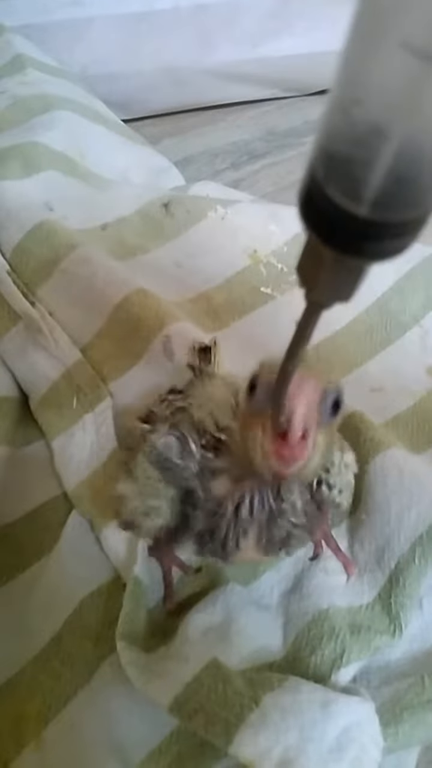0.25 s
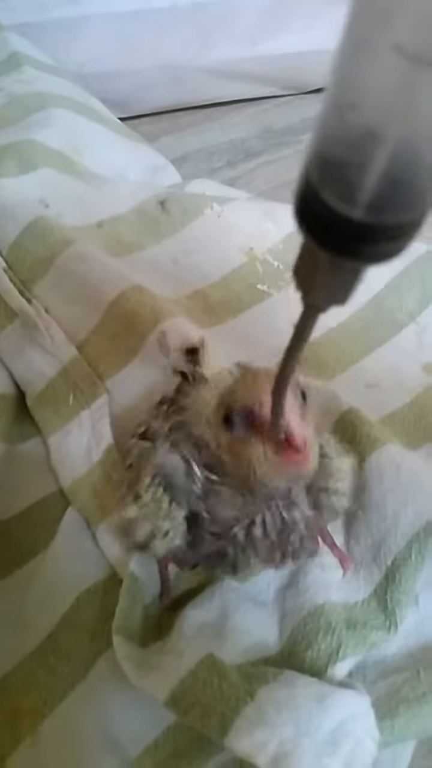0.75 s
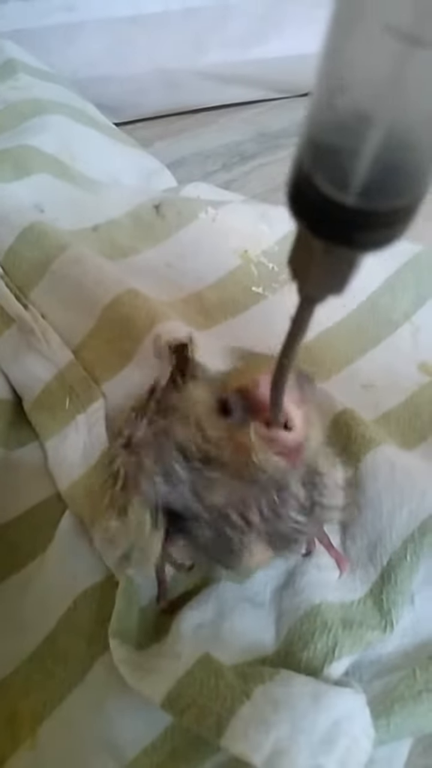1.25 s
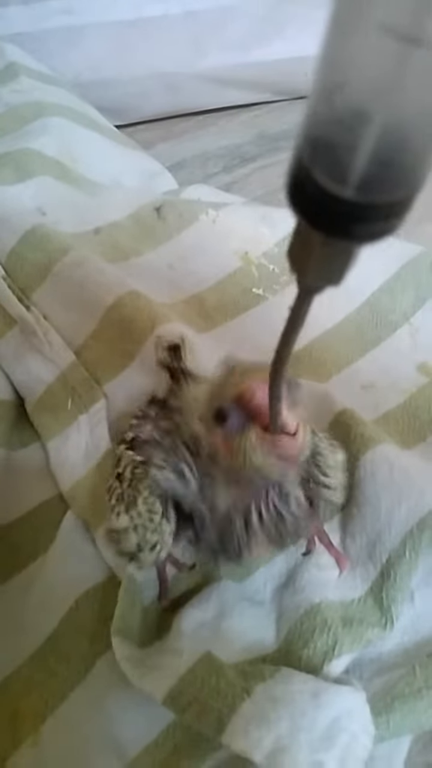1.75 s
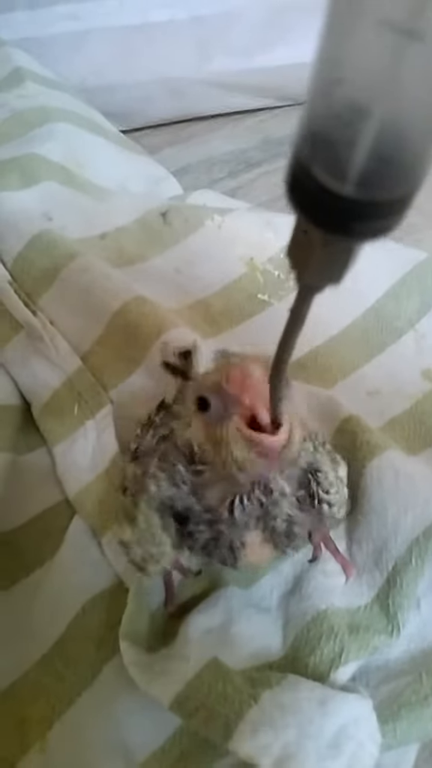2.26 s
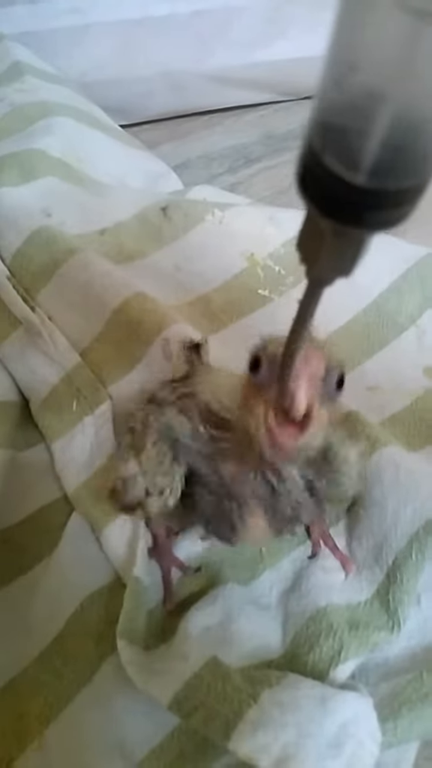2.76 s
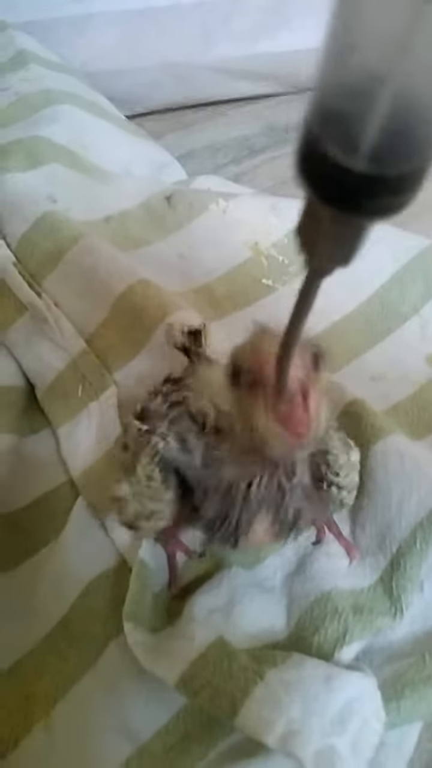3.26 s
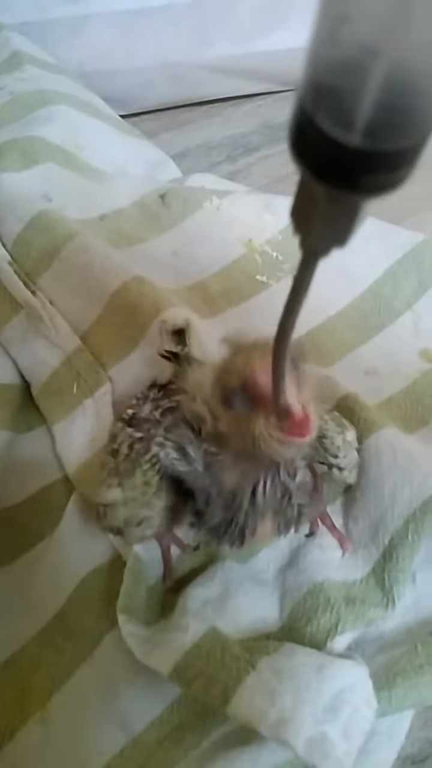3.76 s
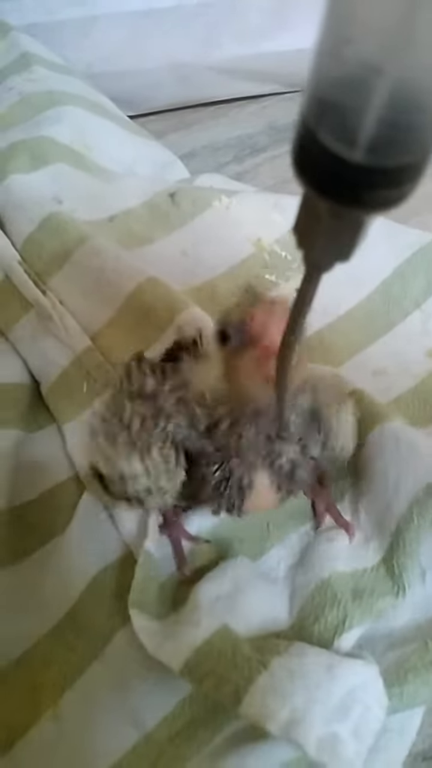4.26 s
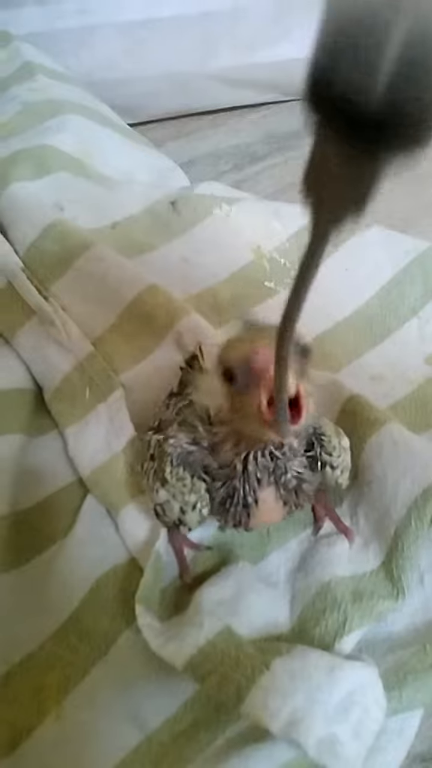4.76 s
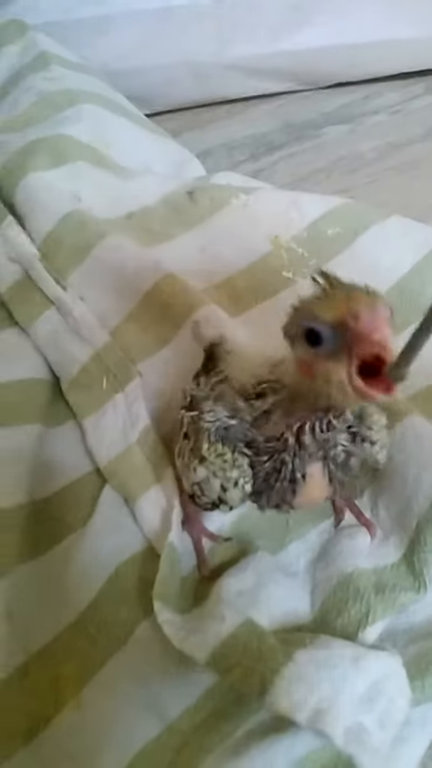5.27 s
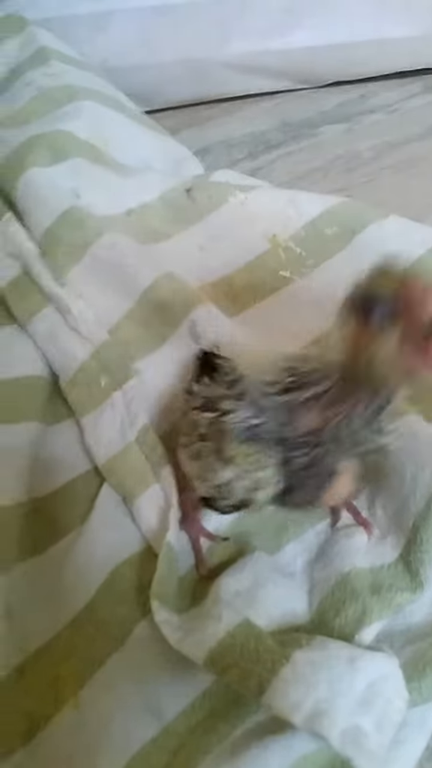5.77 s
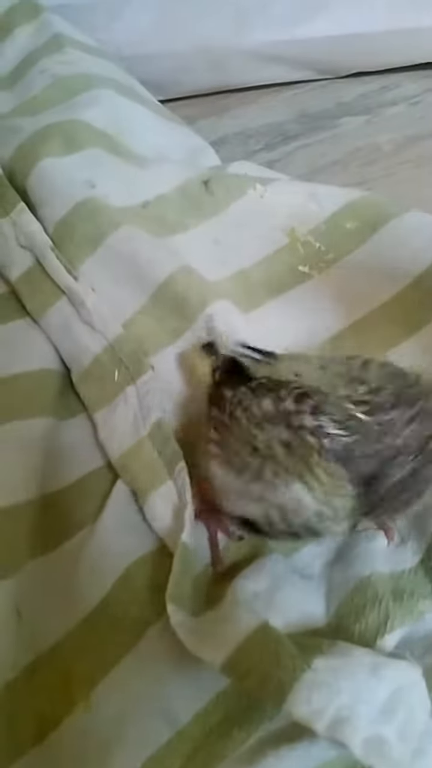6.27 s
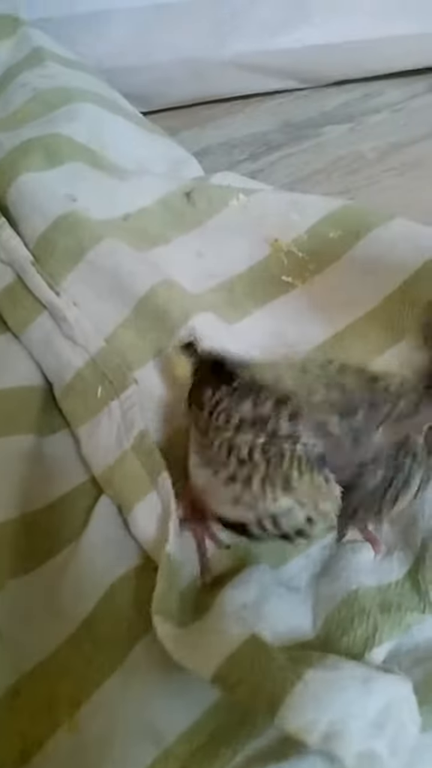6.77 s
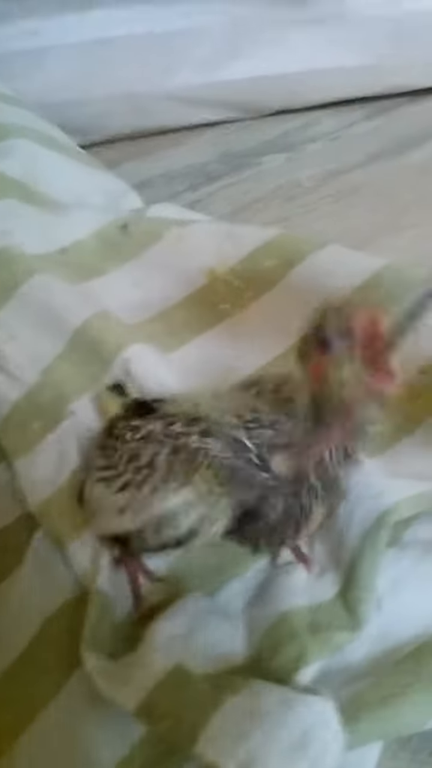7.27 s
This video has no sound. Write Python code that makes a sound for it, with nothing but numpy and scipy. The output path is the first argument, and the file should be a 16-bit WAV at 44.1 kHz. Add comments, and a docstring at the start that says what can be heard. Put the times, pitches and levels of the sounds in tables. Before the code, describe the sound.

A nestling begs close to the microphone in a small, hard-surfaced room, each cheep leaving a short bright ring. Every chirp lasts only a few hundredths of a second, starting very high and snapping steeply downward. From 0 to 0.9 s they are moderate, about six per second; from 0.95 to 2 s they grow piercing, a few with a slight overloaded pop. Weaker chirps follow, mixed with loud ones near 2.8, 3.1, 4.1 and 4.3 s. Tiny wet beak ticks run until about 3.7 s, with thin squeaks and dry rasps between calls. From 4.4 to 5.8 s chirping nearly stops: creaky rasps, a clearer squeak at 4.6 and a single strong chirp at 5.1. At 5.8 s a chirp brings soft, rumbling cloth rustle that stays, swelling unevenly. From 6.25 s to the end at about 7.5 s, mostly loud chirps race on. A faint, wavering low appliance hum and room air continue throughout.

```python
"""Nestling begging at a syringe

A nestling on a towel begs while it is fed from a syringe, close to a microphone in a small hard room.
Each chirp is a harmonic tone of very fast falling pitch that flares as it sweeps through the throat resonance.
Between chirps come faint squeaks (sliding sines), rasps (pulse trains ringing the throat) and, early on, ticks.
An appliance hums as a set of wavering lines; soft rumbling noise sets in as the chick shuffles off."""
import sys
import numpy as np
from scipy import signal
from scipy.fft import rfft, irfft
from scipy.io import wavfile
from scipy.ndimage import uniform_filter1d, minimum_filter1d

SR = 44100
rng = np.random.default_rng(int(sys.argv[2]) if len(sys.argv) > 2 else 0)


def wav_record(signal):
    """Record a signal, one row per channel, as 16-bit PCM in the file named by sys.argv[1]."""
    frames = np.transpose(np.atleast_2d(signal))
    bounded = np.clip(frames, -1, 1)
    # unit amplitude maps onto the largest positive 16-bit level
    quanta = np.round(bounded * 32767).astype(np.int16)
    wavfile.write(sys.argv[1], SR, quanta)


N = 332073
T = np.arange(N) / SR
LEAD = SR // 10  # samples of chirping before the scene opens, so that the room already rings


def undb(db):
    """Amplitude ratio: decibels to gain."""
    return 10 ** (np.asarray(db) / 20)


def gain_at(hz, points):
    """Frequency response: gain at hz, by interpolating (Hz, dB) points on a logarithmic frequency axis."""
    f, db = np.transpose(points)
    return undb(np.interp(np.log(np.maximum(hz, 1)), np.log(f), db))


def colour(x, points):
    """Linear filtering: multiply the spectrum of x by the response through the points."""
    return irfft(rfft(x) * gain_at(np.fft.rfftfreq(len(x), 1 / SR), points), len(x))


def noise(points):
    """Filtered white noise, scaled to rms 1."""
    x = colour(rng.standard_normal(N), points)
    return x / x.std()


def walk(rate, size=N):
    """Band-limited fluctuation: random values, rate per second, joined by lines; spread near 1."""
    at = np.arange(size) * rate / SR
    knots = int(at[-1]) + 2
    return 1.29 * np.interp(at, np.arange(knots), rng.standard_normal(knots))


def add(out, s, x):
    """Superposition: mix x into out from time s on."""
    i = max(int(s * SR), 0)
    out[i:i + len(x)] += x[:len(out) - i]


def gate(length, edge):
    """Times and amplitude envelope of a short sound with sine-squared edges, both in seconds."""
    t = np.arange(int((length + edge) * SR)) / SR
    edge_share = np.clip(np.minimum(t, length + edge - t) / edge, 0, 1)
    return t, np.sin(np.pi / 2 * edge_share) ** 2


def background(air_db=-59.5, waver_db=-0.5, drift_hz=1.2):
    """Stationary noise of the room air plus the line spectrum of an appliance, wavering in level and pitch."""
    # colour of the room air: frequency_hz, density_db
    air_colour = [(30, -37.5), (60, -12.5), (120, -22.5), (180, -6.5), (280, -9.5), (350, -0.5),
                  (420, -5.5), (520, -5.5), (1000, -7.5), (2300, -12.5), (3900, -16), (4800, -53),
                  (8000, -43), (15000, -50)]
    # lines of the appliance hum: frequency_hz, level_db (rms)
    hum_lines = [(66, -78.5), (100, -84.5), (285, -74), (350, -68.5), (500, -65), (746, -71), (1000, -73.5)]
    hum = np.zeros(N)
    for hz, db in hum_lines:
        phase = 2 * np.pi * np.cumsum(hz + drift_hz * walk(6.6)) / SR
        hum += undb(db + waver_db * walk(6.3)) * np.sqrt(2) * np.sin(phase)
    return hum + undb(air_db) * noise(air_colour)


def rustle(start_s=5.78, attack_s=0.046, level_db=-54, shuffle_s=0.069, grain_db=2):
    """Friction noise: the uneven rubbing of cloth and hand sets in and stays, swelling with each shuffle."""
    # spectrum of the rubbing: frequency_hz, gain_db
    rubbing_colour = [(40, -27), (100, -10.5), (200, -11.5), (285, 9), (370, -3), (550, -4.5), (1200, -7.5),
                      (2000, -15.5), (4000, -46)]
    # shuffles: centre_s, swell_db
    shuffle_table = [(5.89, 1.5), (6.35, 3), (6.76, 5), (6.93, 2), (7.22, 3.5), (7.46, 6.5)]
    swell_db = sum(db * np.exp(-((T - s) / shuffle_s) ** 2) for s, db in shuffle_table)
    onset = np.clip((T - start_s) / attack_s, 0, 1)
    return onset * undb(level_db + swell_db + grain_db * walk(40)) * noise(rubbing_colour)


def pops(length_s=0.0035, edge_s=0.00057):
    """Gated noise: brief dull pops of overload under a few of the strong chirps."""
    # pops: centre_s, level_db (rms)
    pop_table = [(1.762, -32.5), (4.319, -36.5), (5.82, -28)]
    # spectrum of a pop: frequency_hz, gain_db
    pop_colour = [(100, -17.5), (400, 1.5), (1000, 1.5), (2500, 0), (5000, -4)]
    bursts = np.zeros(N)
    for s, db in pop_table:
        add(bursts, s - length_s / 2, undb(db) * gate(length_s, edge_s)[1])
    return bursts * noise(pop_colour)


def beak_ticks(per_s=14, tick_db=-42, scatter_db=4, until_s=3.7):
    """Poisson impulses through a resonance: tiny wet clicks while the beak works on the feeding tube."""
    hits = (rng.random(N) < per_s / SR) * (T < until_s)
    sizes = undb(tick_db + scatter_db * rng.standard_normal(N))
    # frequency in Hz, gain in dB
    tick_colour = [(500, -9), (2500, 16.5), (5000, -2.0), (7500, 1.5), (9500, -14.0), (13000, -17.5)]
    return colour(hits * sizes, tick_colour)


def rasps(scatter_db=2, edge_s=0.002, fade_db_per_s=70, flutter_db=1.5):
    """Pulsed excitation: the slack syrinx slaps shut at uneven intervals, each slap ringing the throat."""
    # rasps from the open beak: start_s, length_s, level_db (halfway through)
    rasp_table = [(1.915, 0.05, -42), (2.107, 0.036, -45.5), (2.177, 0.045, -50.5), (2.233, 0.056, -44.5),
                  (2.425, 0.02, -48), (2.593, 0.025, -43), (2.754, 0.02, -47), (4.518, 0.015, -28.5),
                  (4.54, 0.017, -29), (4.602, 0.066, -37.5), (4.687, 0.073, -39.5), (4.874, 0.122, -46),
                  (5.207, 0.022, -39.5), (5.919, 0.056, -41), (6.004, 0.01, -38), (6.038, 0.043, -39),
                  (6.201, 0.044, -48.5), (6.94, 0.06, -45.5), (7.103, 0.035, -38.5)]
    # ring of one slap: frequency_hz, gain_db
    slap_colour = [(2000, -38), (4200, -29.5), (4800, -19.5), (5400, -12), (6000, -4.5), (6600, -15.5),
                   (7400, -28), (8600, -45.5), (9600, -42), (10500, -61)]
    chance = rng.standard_normal((N // 20, 2))
    interval_s = .0018 * np.exp(.35 * chance[:, 0])
    at = (SR * np.cumsum(interval_s)).astype(int)
    slap_sizes = undb(scatter_db * chance[at < N, 1])
    slaps = np.bincount(at[at < N], slap_sizes, N)
    creak = colour(slaps, slap_colour)
    flow = np.zeros(N)
    for s, length, db in rasp_table:
        t, envelope = gate(length, edge_s)
        # each rasp weakens as the air runs out
        add(flow, s, undb(db - fade_db_per_s * (t - length / 2)) * envelope)
    return flow * undb(flutter_db * walk(120)) * creak / creak.std()


def squeaks(length_s=.014, rise_octaves=0.15, jitter=0.017, edge_s=0.0014, broken_db=7):
    """Near-sinusoidal oscillation: the weaker a squeak is blown, the more it slides upward and breaks up."""
    # thin squeaks between chirps: start_s, pitch_hz, level_db (rms)
    squeak_table = [(1.438, 3600, -42), (1.867, 5250, -38.5), (2.416, 5110, -38), (2.571, 4960, -43),
                    (2.729, 5060, -38), (3.046, 5460, -49.5), (3.198, 5770, -42.5), (3.534, 5620, -55),
                    (4.601, 6200, -22.5), (5.184, 5440, -32), (5.906, 4910, -34.5), (6.357, 5460, -34.5),
                    (6.518, 6040, -40), (7.237, 5370, -43)]
    out = np.zeros(N)
    t, envelope = gate(length_s, edge_s)
    for s, hz, db in squeak_table:
        weakness = np.clip((-22 - db) / 12, 0, 1)
        slide = 2 ** (rise_octaves * weakness * (t / length_s - .5))
        pitch = hz * slide * (1 + jitter * (1 + 2 * weakness) * walk(800, len(t)))
        flutter = undb(broken_db * weakness * walk(1100, len(t)))
        pressure = envelope * flutter / np.sqrt(np.mean(flutter ** 2))
        tone = np.sin(2 * np.pi * np.cumsum(pitch) / SR)
        add(out, s, undb(db) * np.sqrt(2) * pressure * tone)
    return out


def chirps(jitter=0.032, flutter_db=0.57, hiss_db=-27):
    """Source and filter: the syrinx snaps open, holds a sagging pitch and breaks downward through the throat."""
    # chirps: start_s, peak_db, upper_pitch_hz, lower_pitch_hz, upper_hold_s
    chirp_table = [(-0.05, -16, 5630, 2640, 0.0013), (0.121, -14.5, 5370, 2730, 0.0011),
                   (0.2898, -9.5, 5450, 2810, 0.0018), (0.455, -17, 5790, 2700, 0.00042),
                   (0.6134, -17, 5720, 2950, 0.0035), (0.7827, -22, 5600, 2640, 0.00016),
                   (0.9435, -4.5, 6400, 3230, 0.0053), (1.1427, -15.5, 6250, 2650, 0.00061),
                   (1.3294, -1.0, 8060, 3776, 0.014), (1.5387, -2.5, 8890, 4440, 0.017),
                   (1.7538, 1.5, 7790, 4010, 0.011), (1.992, 0, 7750, 3926, 0.0083),
                   (2.3325, -10.5, 5700, 2627, 0.0011), (2.5055, -17.5, 6840, 2580, 0.00052),
                   (2.6618, -16.5, 6500, 2570, 0.0007), (2.7965, 0.5, 6600, 3916, 0.0046),
                   (2.9657, -26.5, 6200, 2690, 0.00069), (3.1057, -4.5, 5875, 3586, 0.0049),
                   (3.2766, -18.0, 5390, 2870, 0.0034), (3.4439, -23.5, 5680, 2690, 0.0014),
                   (3.6074, -11, 5770, 3490, 0.0034), (3.775, -15.5, 5820, 3320, 0.0027),
                   (3.9594, -17.5, 5345, 3175, 0.0043), (4.124, -2.5, 8310, 4350, 0.0146),
                   (4.3098, 1, 7850, 3880, 0.011), (5.0822, -1, 7210, 2863, 0.0011),
                   (5.8112, -3, 5636, 2950, 0.0044), (6.2585, 2.5, 6820, 3560, 0.0074),
                   (6.4133, -3, 6190, 3630, 0.0062), (6.5615, -4.5, 6090, 3610, 0.0067),
                   (6.7045, -5, 6200, 3430, 0.0069), (6.8549, -2.5, 6210, 3560, 0.0058),
                   (7.0308, -19.0, 6540, 2730, 0.0007), (7.1514, 2, 6980, 3974, 0.0062),
                   (7.3052, -3.0, 6090, 3540, 0.0055), (7.4487, -2.5, 6640, 3500, 0.0051)]
    # response of throat and beak with the resonance at throat_table_hz: frequency_hz, gain_db
    throat_response = [(1200, -33), (2300, -30), (3200, -16), (4100, -15), (5000, -10), (6200, 2),
                       (7000, -4), (8000, -10), (9000, -16.5), (10200, -30), (12000, -34), (15000, -38)]
    throat_table_hz = 6200
    # harmonics 2 to 5, relative to the overtone level: slope_db
    overtone_slopes = [-1.5, -23, -8.5, -18.5]
    # spectrum of the puff of air: frequency_hz, gain_db
    puff_colour = [(1500, -13.5), (4000, -10.5), (7500, 7), (10000, -14.5), (13000, -8), (16000, -22.5)]
    # the call breaks to a weaker lower pitch and dies away; a longer hold gives a longer call
    break_s, break_db = .00147, -2
    length_s, length_per_hold = .0058, 1.2
    attack_s, release_steepness = 0.0018, 3.95
    snap_octaves, snap_s = .17, 0.0013  # pitch overshoot as the syrinx opens
    sag_octaves = .48  # pitch lost over one call length as the air runs out
    lowest_hz, lowest_knee = 2920, 57  # the pitch levels off at the bottom of the voice
    # the throat resonance sinks as the voice rises: its place for a middling lower pitch, and the power law
    resonance_hz, middling_hz, resonance_power = 5888, 3577, -0.37
    # at the start of a full-scale chirp; dB per dB of loudness; change over one call length
    overtone_start_db, overtone_growth, overtone_fade_db = -6, 1, -2.5
    # the voice thins midway between its two pitches, most in quick chirps:
    # depth at no hold, centre for a middling voice, power law with pitch, width, hold over which it fades
    gap_depth_db, gap_centre_hz, gap_power, gap_width_hz, gap_hold_s = -11.5, 4950, 0.62, 530, 0.013
    # air that escapes as the syrinx opens: in a full-scale chirp, dB per dB of loudness, lead
    puff_db, puff_growth, puff_s = -33.5, 1.3, 0.0023

    out, t = np.zeros(LEAD + N), np.arange(int(SR / 20)) / SR
    hiss, breath = noise(throat_response), noise(puff_colour)
    puff = gate(2 * puff_s, puff_s)[1]
    for s, db, upper_hz, lower_hz, hold in chirp_table:
        age = t / (length_s + length_per_hold * hold)
        broken = (1 + np.tanh((t - hold) / break_s)) / 2
        spent = np.minimum(age, np.sqrt(2))

        bend = snap_octaves * np.exp(-t / snap_s) + sag_octaves * (broken - spent)
        hz = upper_hz * (lower_hz / upper_hz) ** broken * 2 ** bend
        hz = hz * (1 + (lowest_hz / hz) ** lowest_knee) ** (1 / lowest_knee)
        phase = 2 * np.pi * np.cumsum(hz * (1 + jitter * walk(1500, len(t)))) / SR

        envelope = (1 - np.exp(-t / attack_s)) ** 2 * np.exp(-age ** release_steepness)
        gap_hz = gap_centre_hz * (lower_hz / middling_hz) ** gap_power
        gap_db = gap_depth_db * np.exp(-hold / gap_hold_s - ((hz - gap_hz) / gap_width_hz) ** 2)
        pressure = envelope * undb(break_db * broken + gap_db + flutter_db * walk(700, len(t)))

        throat_hz = resonance_hz * (lower_hz / middling_hz) ** resonance_power
        overtone_db = overtone_start_db + overtone_growth * db + overtone_fade_db * spent
        harmonic_levels = [0] + [overtone_db + slope for slope in overtone_slopes]
        tone = np.zeros(len(t))
        for k, harmonic_db in enumerate(harmonic_levels, 1):
            throat_gain = gain_at(k * hz * throat_table_hz / throat_hz, throat_response)
            audible = k * hz < SR / 2  # no aliasing
            tone += undb(harmonic_db) * throat_gain * audible * np.sin(k * phase)

        # a little air rushes through with the tone
        hiss_here = np.roll(hiss, -int(s * SR))[:len(t)]
        air = undb(hiss_db) * gain_at(hz, throat_response) * hiss_here
        voice = pressure * (tone + air)
        add(out, s + LEAD / SR, undb(db) * voice / np.abs(voice).max())
        puff_air = puff * np.roll(breath, -int(s * SR))[:len(puff)]
        add(out, s + LEAD / SR - puff_s, undb(puff_db + puff_growth * db) * puff_air)
    return out


def room(x, wet_db, build_s=0.00067, t60_s=0.46, treble_t60_s=0.38):
    """Reverberation by convolution: near reflections and an exponential diffuse tail, its treble dying sooner."""
    # near surfaces: delay_s, gain_db
    reflection_table = [(.0018, -27.5), (.0031, -21), (.0052, -16), (.0087, -31)]
    # spectrum of the diffuse tail: frequency_hz, gain_db
    tail_colour = [(1000, 5.5), (3000, -5), (4200, 6), (5200, -7), (6300, -9), (8000, -7.5), (14000, -1)]
    t = T[:int(SR)]
    treble_share = np.clip(np.fft.rfftfreq(len(t), 1 / SR) / 4000 - 1, 0, 1)  # rises from 4 to 8 kHz
    diffuse = rng.standard_normal(len(t))
    treble = irfft(rfft(diffuse) * treble_share, len(t))
    tail = (diffuse - treble) * np.exp(-np.log(1000) * t / t60_s)
    tail += treble * np.exp(-np.log(1000) * t / treble_t60_s)
    tail *= 1 - np.exp(-(t / build_s) ** 2)
    response = undb(wet_db) * colour(tail / np.linalg.norm(tail), tail_colour)
    for delay, db in reflection_table:
        response[int(delay * SR)] += undb(db)
    return x + signal.fftconvolve(x, response)[:len(x)]


def scene():
    """Superposition of the chick in its room, the pops, the hum and the rustle."""
    # the tiny throat and beak radiate little below the bottom of the voice: frequency_hz, gain_db
    beak_cut = [(2400, -11), (2780, 0)]
    # colour of the way from the beak to the microphone: frequency_hz, gain_db
    path_colour = [(2500, 1), (3400, -0.5), (4100, -0.5), (4550, 0), (5100, 2), (5900, 0.5), (8000, 0.5),
                   (11000, 2.5)]
    calls = room(colour(chirps(), beak_cut), wet_db=-9.0)[LEAD:]
    faint_sounds = room(squeaks() + rasps() + beak_ticks(), wet_db=-12.0)
    chick = colour(calls + faint_sounds, path_colour)
    return (chick + pops() + background() + rustle())[None]


def record(dry, ceiling=1.03, top_hz=15900):
    """Peak limiting and low-pass filtering: a fast limiter holds peaks to the ceiling, clipping trims them to 1."""
    needed = ceiling / np.maximum(np.abs(dry), ceiling)
    gain = uniform_filter1d(minimum_filter1d(needed, size=33), size=33)
    clipped = np.clip(gain * dry, -1, 1)
    low_pass = signal.ellip(8, .2, 70, top_hz, fs=SR, output="sos")
    return signal.sosfilt(low_pass, clipped)


dry = scene()
out = record(dry)
wav_record(out)
```